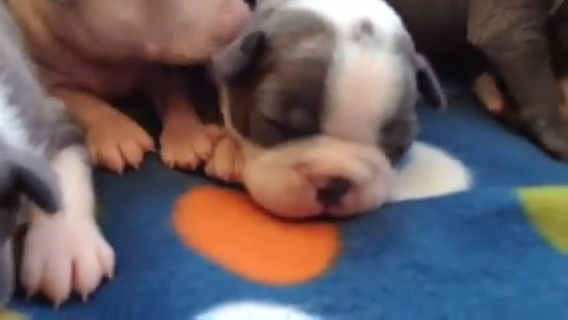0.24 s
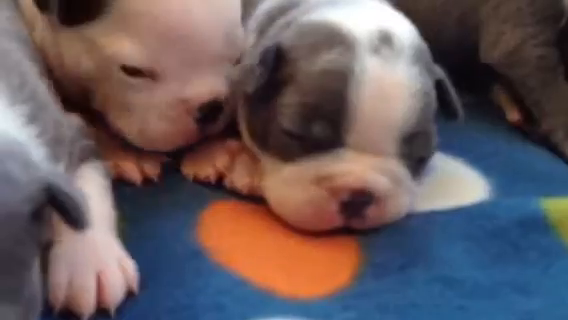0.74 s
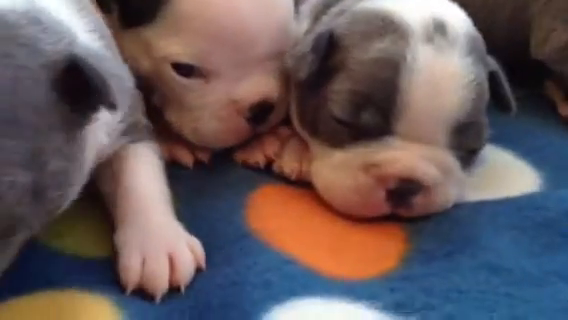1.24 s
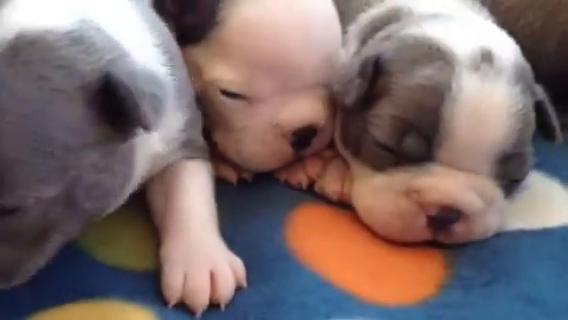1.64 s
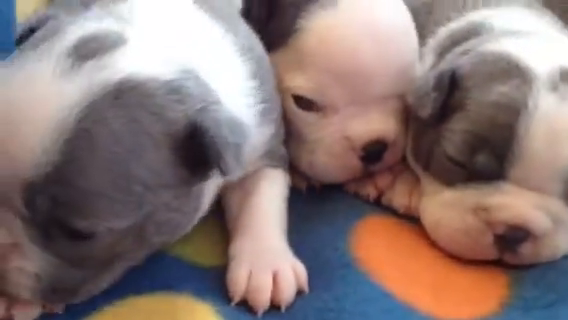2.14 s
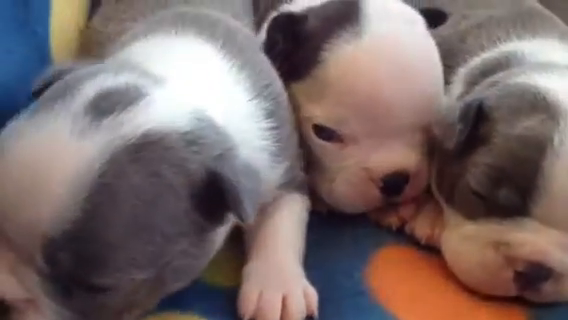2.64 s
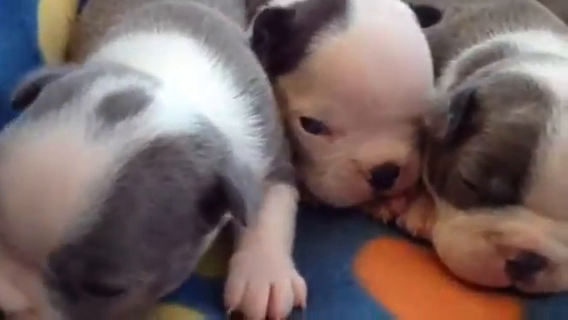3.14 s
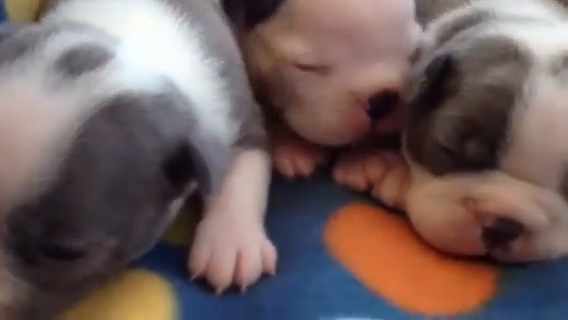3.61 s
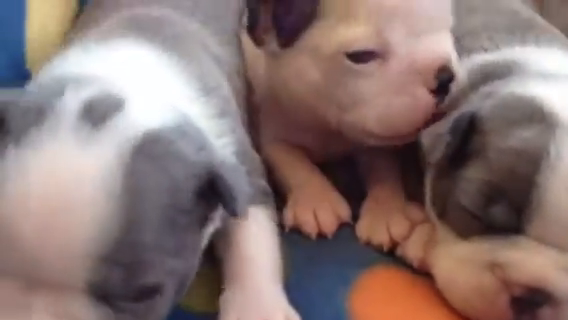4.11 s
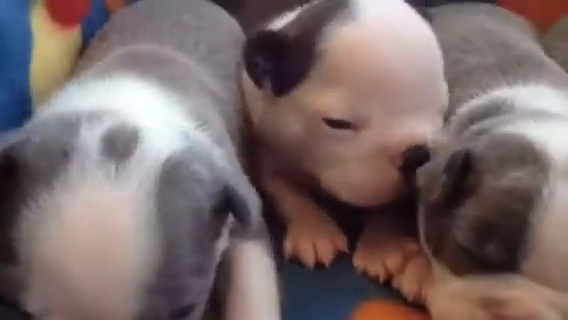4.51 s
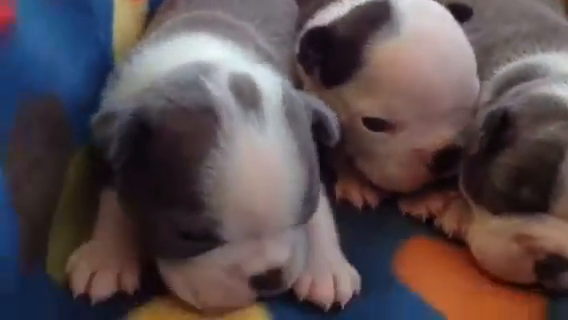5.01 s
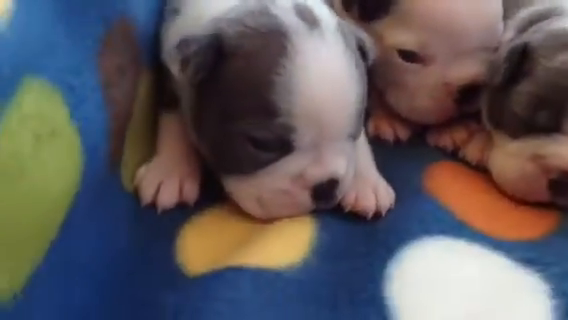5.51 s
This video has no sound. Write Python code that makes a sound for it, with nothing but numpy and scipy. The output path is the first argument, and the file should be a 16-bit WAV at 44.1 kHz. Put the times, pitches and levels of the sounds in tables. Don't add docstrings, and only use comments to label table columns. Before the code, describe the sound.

Close to a small microphone indoors, a tiny puppy squeaks, whimpers and grunts in short separate cries, mostly falling in pitch. Small lip clicks and soft nose puffs follow them. Near the middle the cries thin out, then two loud high yelps burst out, followed by sinking whines and a last rough grunt. A low murmur and light hiss lie beneath.

```python
import sys
import numpy as np
from scipy import signal
from scipy.io import wavfile
from scipy.ndimage import uniform_filter1d

SR = 44100
rng = np.random.default_rng(int(sys.argv[2]) if len(sys.argv) > 2 else 0)


def voltage_ratio(decibels):
    exponent = np.asarray(decibels, float) / 20
    return 10 ** exponent


def int16_out(signal):
    q = np.round(np.clip(np.atleast_2d(signal).T, -1, 1) * 32767)
    wavfile.write(sys.argv[1], SR, q.astype(np.int16))


N = 254016
T = np.arange(N) / SR


def evened(x):
    return x / np.sqrt(np.mean(x ** 2) + 1e-20)


def read(points, hz):
    f, value = np.transpose(points)
    return np.interp(np.log(hz + 1), np.log(f + 1), value)


def add(mix, s, sound):
    part = mix[round(s * SR):][:len(sound)]
    part += sound[:len(part)]


def swell(s, length_s):
    out = np.zeros(N)
    add(out, s, signal.windows.tukey(round(length_s * SR), .6))
    return out


def noise(points, patchy_db):
    hz = np.fft.rfftfreq(1024, 1 / SR)
    a, b, patches = rng.standard_normal((N // 256 + 5, 513, 3)).T
    patches = uniform_filter1d(patches, size=8, axis=0)
    patches = evened(uniform_filter1d(patches, size=10, axis=1))
    z = (a + 1j * b) * voltage_ratio(read(points, hz)[:, None] + patchy_db * patches)
    return evened(signal.istft(z, nperseg=1024, noverlap=768)[1][:N])


def ring(x, hz, width_hz):
    b, a = signal.iirpeak(hz, hz / width_hz, SR)
    return signal.lfilter(b, a, signal.lfilter(b, a, x))


def play(tables, edge_s):
    s, *columns = np.vstack(tables).T
    gate = np.zeros(N)
    for rows in tables:
        gate[round(rows[0][0] * SR):round(rows[-1][0] * SR)] = 1
    gate = uniform_filter1d(gate, max(round(edge_s * SR), 1))
    s = np.maximum.accumulate(s)
    return gate, *(uniform_filter1d(np.interp(T, s, c), size=90) for c in columns)


def folds(hz, wobble):
    waver = evened(uniform_filter1d(rng.standard_normal(N), size=200))
    return np.cumsum(hz * (1 + wobble * waver)) / SR


# frequency in Hz, density in dB per Hz.
ROOM = [(15, -76), (25, -44), (99, -29), (178, 1.5), (331, -6), (444, -7.5), (508, -6.5), (782, -19.5),
        (944, -12), (1620, -24.5), (1900, -22), (3340, -28), (3620, -26.5), (4610, -29), (15500, -35)]
ROOM_DB = -57.5
# time in seconds, level in dB.
MURMUR = [
    (0, -66),
    (2.6, -61),
    (3.6, -81),
    (5.76, -63.5),
]


def room():
    band_level = voltage_ratio(np.interp(T, *np.transpose(MURMUR)))
    band = band_level * evened(ring(rng.standard_normal(N), 526, 102))
    return voltage_ratio(ROOM_DB) * noise(ROOM, patchy_db=2) + band


# frequency in Hz, width in Hz, level in dB.
RINGS = [(567, 2700, 2), (1030, 430, 22.5), (1500, 590, 10), (2030, 1400, 7), (2700, 210, 19.5)]


def throat(x):
    return evened(sum((-1) ** k * voltage_ratio(db) * ring(x, f, w) for k, (f, w, db) in enumerate(RINGS)))


# frequency in Hz, gain in dB.
NOSE = [(5500, -59), (7020, -29), (8750, -24.5), (9960, -12), (11200, -14.5), (12500, -25.5), (13600, -27),
        (14800, -24)]
# frequency in Hz, level in dB.
NOSE_AIR = [(5000, -22), (8000, -1), (10500, 9.5), (12000, 6), (13200, -11), (14500, 3), (15500, -10)]
PATCHY_DB = 3


def nose(turns, hz, db, air_share):
    lines, power = np.zeros(N), 1e-9
    drift = evened(uniform_filter1d(rng.standard_normal((16, N // 256 + 2)), size=5, axis=1))
    drift_s = np.arange(drift.shape[1]) * 256 / SR
    for k in range(3, 16):
        gain = voltage_ratio(read(NOSE, k * hz)) * np.clip((k * hz - 5500) / 1000, 0, 1) * (k * hz < 15500)
        patches = voltage_ratio(PATCHY_DB * np.interp(T, drift_s, drift[k]))
        lines += patches * gain * np.cos(2 * np.pi * k * turns)
        power = power + gain ** 2 / 2
    lines = lines / np.sqrt(power)
    air_share = np.clip(air_share, 0, 1)
    breath = noise(NOSE_AIR, patchy_db=2.0)
    return voltage_ratio(db) * (np.sqrt(1 - air_share) * lines + np.sqrt(air_share) * breath)


EDGE_DB, EDGE_S = 44, 0.01
NOSE_OPEN_S, NOSE_SHUT_S, NOSE_SHUT_DB = 0.028, 0.0063, -13


def cry(rows, attack_s, release_s, pressed_db, first_db, last_db):
    s, hz, db = np.transpose(rows)
    rise_db, fall_db = -EDGE_DB * np.tanh(np.abs([attack_s, release_s]) / EDGE_S)
    nose_db = np.interp(s, s[[0, -1]], [first_db, last_db])
    opening = np.exp((s[0] - s) / NOSE_OPEN_S) / 2
    nose_db += NOSE_SHUT_DB * (np.exp((s - s[-1]) / NOSE_SHUT_S) + opening)
    body = np.column_stack([s, hz, db, pressed_db + 0 * s, nose_db])
    start = body[0] + [-attack_s, 0, rise_db, 0, rise_db]
    end = body[-1] + [release_s, 0, fall_db, fall_db / 3, fall_db / 2]
    return np.vstack([start, body, end])


# time in seconds, pitch in Hz, effort in dB.
EARLY = [
    [(.052, 1310, -38.5), (.055, 955, -42)],
    [(.419, 1502, -36.5), (.421, 1420, -49)],
    [(.724, 1790, -32.5), (.728, 1520, -34.5), (.74, 1388, -38), (.759, 1311, -36), (.8, 1421, -34),
     (.832, 1319, -32), (.859, 1344, -35.5), (.866, 1073, -31.5), (.872, 1100, -26)],
    [(1.078, 1915, -32), (1.09, 2030, -34.5), (1.102, 2160, -36.5)],
    [(1.1025, 1876, -33.5), (1.119, 1875, -33), (1.143, 1733, -35.5), (1.177, 1630, -38),
     (1.189, 1565, -38), (1.213, 1480, -36), (1.223, 1113, -33), (1.233, 1186, -40.5)],
    [(1.428, 1497, -40.5), (1.474, 1397, -39.5), (1.503, 1216, -49), (1.518, 1160, -38), (1.54, 1110, -38),
     (1.568, 1130, -38), (1.636, 1001, -33.5), (1.643, 755, -31.5), (1.649, 938, -29)],
    [(1.885, 1097, -33.5), (1.892, 1060, -39), (1.907, 1002, -34), (1.945, 1087, -38.5),
     (1.973, 944, -31.5), (1.989, 919, -35.5), (2.002, 792, -33.5)],
]
YELPS = [
    [(2.997, 1185, -49.5), (3.006, 1190, -39.5)],
    [(3.524, 1640, -49), (3.574, 1477, -49), (3.588, 1333, -51), (3.616, 1128, -47), (3.628, 980, -47),
     (3.652, 702, -54.5)],
    [(3.828, 2700, -24.5), (3.833, 2355, -37.5), (3.842, 2216, -27.5), (3.857, 2145, -27),
     (3.862, 1910, -23), (3.878, 2076, -25.5), (3.895, 2103, -27), (3.909, 1862, -23), (3.915, 1940, -26.5)],
    [(3.9155, 1434, -39), (3.932, 1433, -41), (3.946, 1511, -34.5), (3.973, 1609, -44.5)],
    [(4.113, 2390, -40.5), (4.12, 2455, -40), (4.123, 2120, -32.5), (4.148, 2252, -32.5),
     (4.193, 1830, -27.5), (4.233, 1825, -29.5), (4.246, 1690, -36), (4.259, 1498, -27.5),
     (4.264, 1394, -39)],
]
LATE = [
    [(4.441, 1545, -42), (4.488, 1880, -35.5), (4.516, 1857, -33.5), (4.549, 1668, -41.5),
     (4.572, 1680, -41), (4.597, 1577, -37), (4.637, 1554, -37.5), (4.663, 1260, -31), (4.673, 1324, -33.5)],
    [(4.861, 1318, -42), (4.887, 1374, -43.5), (4.946, 1189, -36.5), (4.976, 1149, -35),
     (5.02, 1118, -35.5), (5.045, 1037, -34), (5.067, 1023, -35), (5.074, 757.6, -37.5),
     (5.081, 959, -30.5)],
    [(5.404, 1039, -48), (5.421, 903, -63), (5.445, 816, -54.5)],
]
# attack in seconds, release in seconds, pressed folds in dB,
# nose overtones at first in dB, at last in dB.
MANNER = [(0.012, 0.00413, -5, -51, -63), (0.019, 0.00173, 0.5, -66, -56), (0.01, 0.0068, 3, -50.5, -44),
          (0.016, 0.00016, -7, -59, -53), (0.00018, 0.005915, 1.5, -50, -52.5),
          (0.00299, 0.01008, 5, -63, -63.5), (0.00032, 0.00355, 3.5, -75, -70),
          (0.013, 0.00219, -8, -80, -80), (0.0037, 0.000314, 11.5, -67, -82),
          (0.0059, 0.00015, -12.5, -40, -47), (0.0005, 0.087, 13.5, -48, -59),
          (0.00303, 0.01994, -2, -48.5, -45), (0.003, 0.021, -0.5, -52.5, -50.5),
          (0.0046, 0.0066, 0.5, -58.5, -63.5), (0.0068, 0.0027, 12.5, -78, -77)]
# pitch in Hz, level under fundamental in dB.
OCTAVE = [(800, -15), (1050, -10.5), (1300, -3), (1450, -11.5), (1600, -24), (1900, -31), (2150, -31.5),
          (2700, -53)]
# frequency in Hz, gain in dB.
THROAT = [(410, -30), (700, -6.5), (1160, 14), (2270, 8), (2690, 7), (3270, -17), (3770, -19), (4250, -32),
          (4800, -28.5), (7020, -36.5)]
# start in seconds, length in seconds, dB.
CLOSURE = [(1.101, 0.021, -10), (1.426, .022, -10), (1.496, 0.021, 0.5), (1.641, .022, -14),
           (3.829, 0.041, 12.5), (3.866, 0.046, -20), (3.903, .014, 12), (3.954, .07, -10),
           (4.113, 0.017, -16), (4.152, 0.039, -8), (4.545, 0.025, 2), (4.664, 0.021, -11),
           (4.859, .012, -20), (4.904, 0.032, -13.5), (5.073, 0.027, -17)]
# start in seconds, #
# length in seconds, overtone gain in dB.
GAPES = [(1.11, 0.087, -8), (4.635, 0.05, -6), (0.74, 0.12, -7), (3.52, 0.16, 12.5), (4.12, 0.84, 8),
         (5.415, 0.06, 15.5)]
# start in seconds, length in seconds, half lines in dB, rasp in dB,
# both under the fundamental.
DOUBLING = [(0.732, 0.0088, -20, -22), (0.856, 0.01, -23, -32), (1.104, 0.012, -19, -42),
            (1.425, 0.015, -15, -3.5), (1.436, 0.033, -21, -40), (3.62, 0.087, -38, -0.5),
            (3.86, 0.062, -50, -35), (3.92, 0.054, -45, -26), (3.931, 0.027, -30, -43),
            (4.117, 0.039, -38, -30.5), (4.22, 0.044, -44, -23), (4.861, 0.0086, -13.5, -9),
            (4.919, 0.019, -31, -29)]
# start in seconds, length in seconds, rate in Hz, depth.
FLUTTER = (4.93, 0.144, 54, 0.14)
# start in seconds, length in seconds, added share.
BREATHY = [(.715, .03, .6), (.855, .03, .5), (1.095, .03, .5), (1.21, .03, .4), (3.862, .06, .4),
           (3.915, .03, .5), (4.215, .055, .3), (4.59, .03, .2), (4.645, .035, .4)]
AIR_SHARE = .04
THIRD_DB, WOBBLE = -3, 0.00227
OVERTONE_PATCHY_DB = 2.5


def squeaks():
    cries = [cry(rows, *manner) for rows, manner in zip(EARLY + YELPS + LATE, MANNER)]
    gate, hz, one_db, pressed_db, nose_db = play(cries, 0.0017)
    two_db = one_db + pressed_db + read(OCTAVE, hz)
    turns = folds(hz, WOBBLE)
    closure_db = sum(db * swell(s, length) for s, length, db in CLOSURE)
    voice = voltage_ratio(one_db) * np.sin(2 * np.pi * turns)
    voice += voltage_ratio(two_db + closure_db) * np.cos(4 * np.pi * turns)
    source_db = two_db - read(THROAT, 2 * hz) + THIRD_DB
    source_db += sum(db * swell(s, length) for s, length, db in GAPES)
    flicker = evened(uniform_filter1d(rng.standard_normal((10, N)), size=900, axis=1))
    for k in range(3, 10):
        flicker_db = OVERTONE_PATCHY_DB * (flicker[k] - 1) * np.clip(k * hz / 1000 - 3, 0, 1)
        level = voltage_ratio(source_db + flicker_db + read(THROAT, k * hz))
        level *= np.clip((7300 - k * hz) / 1000, 0, 1)
        voice += level * np.cos(2 * np.pi * k * turns)
    doubled = sum(voltage_ratio(db) * swell(s, length) for s, length, db, _ in DOUBLING)
    for k in (1, 3):
        voice += doubled * voltage_ratio(one_db + read(THROAT, k * hz / 2)) * np.sin(np.pi * k * turns)
    rasp = sum(voltage_ratio(db) * swell(s, length) for s, length, _, db in DOUBLING)
    voice += rasp * voltage_ratio(one_db) * throat(rng.standard_normal(N))
    start_s, length_s, rate_hz, depth = FLUTTER
    voice *= 1 + depth * swell(start_s, length_s) * np.sin(2 * np.pi * rate_hz * T)
    air_share = AIR_SHARE + sum(share * swell(s, length) for s, length, share in BREATHY)
    return gate * (np.sqrt(2) * voice + nose(turns, hz, nose_db, air_share))


GRUNT_RISE_S, GRUNT_FALL_S = 0.00514, 0.00274


def grunt(s, length_s, first_hz, last_hz, db, growth_db, rattle_db, nose_db, sag):
    u = np.linspace(0, 1, num=6)
    hz = first_hz + (last_hz - first_hz) * u ** sag
    body = np.column_stack([s + u * length_s, hz, db + growth_db * u, rattle_db + 0 * u, nose_db + 0 * u])
    start = body[0] - [GRUNT_RISE_S, 0, 25, 12, 12]
    end = body[-1] + [GRUNT_FALL_S, 0, -15, -4, -4]
    return np.vstack([start, body, end])


CATCH_EDGE_DB, CATCH_NOSE_DB = -10.5, -40


def catch(s, length_s, hz, db, rattle_db):
    return np.array([(s + side * length_s / 2, hz, db + CATCH_EDGE_DB * abs(side),
                      rattle_db - 6 * abs(side), db + CATCH_NOSE_DB) for side in (-1, 0, 1)])


SPLIT = [3, 3, 2, 2, 2, 4, 5, 2, 2]
# frequency in Hz, gain in dB.
RATTLE = [(250, -7), (600, -1.5), (1000, 2), (1450, 3.5), (2000, 2), (2650, -4.5), (3200, -24), (4000, -55)]
STRAND_PATCHY_DB, STRAND_SLIP_RAD = 4, .9


def strands(turns, hz):
    starts = np.array(GRUNTS)[:, 0]
    split = np.array(SPLIT)[np.maximum(np.searchsorted(starts, T + .02) - 1, 0)]
    drift = evened(uniform_filter1d(rng.standard_normal((34, N // 64 + 2)), size=7, axis=1))
    drift_s = np.arange(drift.shape[1]) * 64 / SR
    lines, power = np.zeros(N), 1e-9
    for k in range(1, 17):
        gain = voltage_ratio(read(RATTLE, k * hz / split)) * (split != k)
        slip = STRAND_SLIP_RAD * np.interp(T, drift_s, drift[17 + k])
        patches = voltage_ratio(STRAND_PATCHY_DB * np.interp(T, drift_s, drift[k]))
        lines -= gain * patches * np.cos(2 * np.pi * k * turns / split + slip)
        power += gain ** 2 / 2
    return lines / np.sqrt(power)


# start in seconds, length in seconds, first pitch in Hz, last pitch in Hz, voice in dB.
GRUNTS = [
    (0.071, 0.035, 1135, 986.5, -48),
    (0.423, 0.033, 1370, 1030, -45.5),
    (1.399, 0.0084, 1396, 1442, -45.5),
    (1.869, 0.015, 985, 1119, -69),
    (2.249, 0.056, 1121, 794, -45.5),
    (2.594, .05, 1090, 972, -46.5),
    (3.007, 0.061, 1017, 1047, -46.5),
    (5.305, 0.097, 1135, 1087, -49),
    (5.403, 0.043, 1027, 835, -47),
]
# voice growth in dB, rattle in dB, nose in dB,
# sag as the power of time that the pitch follows.
GRAIN = [(3.5, -54.5, -61, 1.55), (-2, -54, -58, 0.645), (-5, -61.5, -72, 2.6), (6, -54.5, -75, 0.86),
         (-2.5, -55, -92, 0.506), (-0.5, -60.5, -90, 1.44), (-7.5, -60, -72.5, 1.57), (-5, -60, -76, 0.62),
         (-9, -62, -72, 0.65)]
# peak in seconds, length in seconds, pitch in Hz, voice in dB, rattle in dB.
CATCHES = [(0.112, 0.018, 850, -36, -54.5), (0.461, 0.011, 898.6, -41, -58), (2.31, 0.01, 826.7, -38, -57),
           (2.65, 0.014, 760.6, -54, -70), (3.079, 0.016, 930, -58, -80), (4.836, 0.0072, 1176, -46.5, -65),
           (5.451, 0.011, 758, -37, -55), (5.464, 0.02, 893, -49, -64)]
BREAKS = [.081, 0.103, 0.435, 0.457, 2.257, 2.264, 2.305, 2.601, 2.615, 2.626, 2.642, 5.31, 5.33, 5.355,
          5.37]
BREAK_S, BREAK_DB = 0.0048, -12.5
# start in seconds, length in seconds, rate in Hz, depth.
GROWL = (3.015, 0.039, 430, 0.26)
STRAND_SHARE = .6


def grunts():
    pushes = [grunt(*a, *b) for a, b in zip(GRUNTS, GRAIN)]
    pushes += [catch(*row) for row in CATCHES]
    gate, hz, one_db, rattle_db, nose_db = play(sorted(pushes, key=lambda rows: rows[1, 0]), 0.0026)
    turns = folds(hz, .032)
    cycle = turns.astype(int)
    strength = np.full(N, .08)
    strength[np.cumsum(2 + rng.poisson(.3, N // 8))] = 1
    strength *= voltage_ratio(2.2 * rng.standard_normal(N))
    pulses = np.diff(cycle, prepend=0) * strength[cycle]
    pulses = evened(pulses) + .3 * rng.standard_normal(N)
    rattle = np.sqrt(STRAND_SHARE) * strands(turns, hz) + np.sqrt(1 - STRAND_SHARE) * throat(pulses)
    shimmer_db = 2.0 * evened(uniform_filter1d(rng.standard_normal(N), size=130))
    voice = -np.sqrt(2) * voltage_ratio(one_db + shimmer_db + 7.0) * np.cos(2 * np.pi * turns)
    voice += voltage_ratio(rattle_db + 11) * rattle
    voice *= voltage_ratio(BREAK_DB * sum(swell(s - BREAK_S / 2, BREAK_S) for s in BREAKS))
    start_s, length_s, rate_hz, depth = GROWL
    voice *= 1 + depth * swell(start_s, length_s) * np.sin(2 * np.pi * rate_hz * T)
    return gate * (voice + nose(turns, hz, nose_db, 0.64))


# start in seconds, length in seconds, level in dB.
PUFFS = [(0.115, 0.08, -60), (0.228, 0.058, -69), (0.466, 0.042, -59.5), (0.875, 0.037, -60.5),
         (1.238, 0.032, -63), (1.649, 0.047, -59), (2.005, 0.044, -60.5), (2.315, 0.056, -63.5),
         (2.658, 0.052, -67.5), (2.785, 0.12, -69.5), (3.653, 0.037, -65), (3.974, 0.052, -60.5),
         (4.267, 0.034, -59.5), (4.309, 0.12, -67), (4.672, 0.033, -58.5), (4.716, 0.086, -65.5),
         (5.082, 0.034, -59), (5.46, 0.1, -66)]
# frequency in Hz, level in dB.
PUFF = [(500, -1), (1500, 6.5), (3000, 2), (6000, -6.5), (8500, -3), (10200, -1.5), (12500, 0), (14500, -2)]


def puffs():
    level = np.zeros(N)
    for s, length_s, db in PUFFS:
        u = np.linspace(0, 1, round(length_s * SR))
        add(level, s, voltage_ratio(db) * 2.66 * np.sqrt(u) * (1 - u) * (1.5 - u / 2))
    return level * noise(PUFF, 0.72)


# start in seconds, length in seconds, top in Hz, end in Hz, level in dB.
WHISTLES = [(0.163, .022, 14800, 12000, -59), (0.18, .011, 10400, 9600, -60),
            (4.682, .045, 1330, 1300, -62), (4.808, 0.051, 10600, 10000, -71),
            (0.94, 0.039, 9560, 9100, -62), (0.968, 0.019, 10380, 9300, -64),
            (1.301, 0.032, 15000, 14160, -64), (3.235, 0.015, 3380, 3260, -64.5),
            (3.865, .035, 1630, 1600, -47), (3.828, 0.054, 2810, 2770, -57),
            (4.004, 0.042, 11800, 10000, -65)]


def whistles():
    out = np.zeros(N)
    for s, length_s, top_hz, end_hz, db in WHISTLES:
        u = np.linspace(-.4, 1, round(length_s * SR))
        hz = top_hz - (top_hz - end_hz) * u ** 2
        add(out, s, voltage_ratio(db) * np.hanning(len(u)) ** .5 * np.sin(2 * np.pi * np.cumsum(hz) / SR))
    return out


# time in seconds, peak in dB, mouth ring in Hz,
# low thud in dB, top tick in dB.
SNAPS = [(0.228, -42.5, 2300, -58, -57), (.24, -61, 4200, -64, -51), (0.251, -48, 1070, -62, -55),
         (0.722, -54, 3390, -64, -62), (1.021, -47.5, 1860, -55, -57), (1.425, -58, 2700, -48, -66),
         (1.642, -41, 1536, -39, -56), (1.998, -32.5, 1500, -32, -66), (2.018, -41, 2592, -58, -68),
         (2.421, -45, 1240, -41, -66), (3.435, -43.5, 1970, -52, -75), (3.52, -42.5, 2120, -65, -72),
         (3.527, -62, 4200, -65, -53), (3.553, -56, 2300, -70, -68), (3.649, -35.5, 1320, -30.5, -68),
         (3.932, -54, 4340, -70, -39), (3.951, -58, 4500, -68, -44), (3.957, -49, 4070, -70, -41),
         (3.978, -41, 3920, -70, -48), (4.122, -47.5, 2700, -38, -58), (4.427, -36.5, 1570, -39, -58),
         (4.441, -43, 2610, -52, -63), (4.801, -39.5, 2350, -23.5, -50), (4.807, -53, 1227, -21.5, -70),
         (5.073, -32, 2314, -58, -68), (5.424, -35, 1370, -32, -68), (5.451, -33, 1363, -47, -66),
         (5.756, -41.5, 1500, -58, -68)]
LIP_TICK_HZ, NOSTRIL_TICK_HZ = 8400, 12200


def snaps():
    out, t = np.zeros(N), np.arange(900) / SR
    bursts = rng.standard_normal((len(SNAPS), 900))
    for (s, db, hz, thud_db, tick_db), burst in zip(SNAPS, bursts):
        burst = burst * t / .0008 * np.exp(-t / 0.0011)
        mouth = ring(ring(burst, hz, hz), hz, hz / 2)
        if hz < 3900:
            mouth = mouth + ring(ring(burst, 950, 950), 950, 700)
        tick = ring(burst, LIP_TICK_HZ, 12000) if hz < 4110 else ring(burst, NOSTRIL_TICK_HZ, 5000)
        thud = np.sin(2 * np.pi * 260 * t) * t / 0.0015 * np.exp(1 - t / 0.00055)
        snap = voltage_ratio(db) * mouth / abs(mouth).max() + voltage_ratio(tick_db) * tick / abs(tick).max()
        add(out, s, snap + voltage_ratio(thud_db) * thud)
    return out


# time in seconds, pitch in Hz, level in dB.
MATE = [
    (3.868, 570.6, -54),
    (3.88, 561, -55.5),
    (3.935, 619, -56.5),
    (3.962, 461, -53.5),
]


def mate():
    gate, hz, db = play([MATE], 0.0041)
    turns = folds(hz, 0.0052)
    hum = np.sin(2 * np.pi * turns) + voltage_ratio(-4.0) * np.sin(4 * np.pi * turns)
    return gate * np.sqrt(2) * voltage_ratio(db) * hum


# time in seconds, frequency in Hz, level in dB.
BUMPS = [
    (4.073, 158, -45),
    (4.093, 95, -43),
]


def bump():
    out, t = np.zeros(N), np.arange(4000) / SR
    for s, hz, db in BUMPS:
        add(out, s, voltage_ratio(db) * np.sin(2 * np.pi * hz * t) * t * hz * np.exp(1 - t * hz * 1.35))
    return out


# start in seconds, length in seconds, level in dB.
WHEEZES = [
    (4.12, 0.17, -75),
    (5.015, 0.04, -64),
    (5.298, 0.2, -71),
]


def wheezes():
    level = sum(voltage_ratio(db) * swell(s, length) for s, length, db in WHEEZES)
    return level * evened(ring(rng.standard_normal(N), 14860, 2200))


SCATTER_DB, SCATTER_T60_S = -33, .09


def echo(x):
    t = np.arange(SR // 4) / SR
    tail = uniform_filter1d(rng.standard_normal(len(t)), size=3)
    tail = tail * voltage_ratio(-60 * t / SCATTER_T60_S) * (t > .002)
    return voltage_ratio(SCATTER_DB) * signal.fftconvolve(x, tail / np.linalg.norm(tail))[:N]


def scene():
    pups = squeaks() + grunts() + puffs() + whistles() + snaps() + mate() + voltage_ratio(4) * bump() + wheezes()
    pups = signal.sosfilt(signal.butter(3, 140, "high", fs=SR, output="sos"), pups)
    return (pups + echo(pups) + room())[None]


def low_pass(x):
    return signal.sosfilt(signal.butter(12, 15620, fs=SR, output="sos"), x)


def record(dry):
    edge = signal.firwin(511, 15340, window=("kaiser", 9), fs=SR)
    mix = signal.oaconvolve(dry, edge[None], "same")
    return low_pass(mix)


dry = scene()
out = record(dry)
int16_out(out)
```